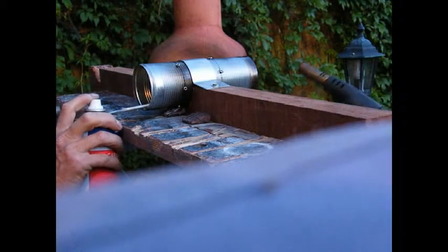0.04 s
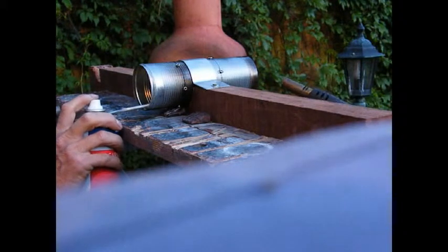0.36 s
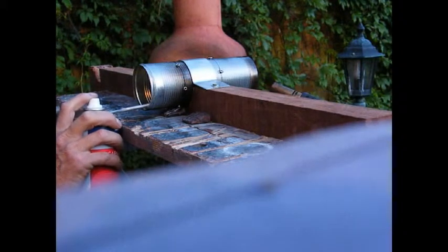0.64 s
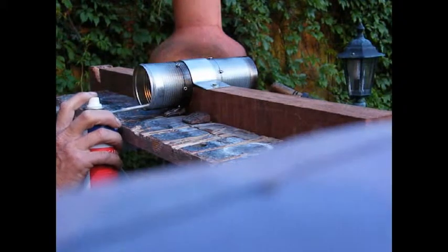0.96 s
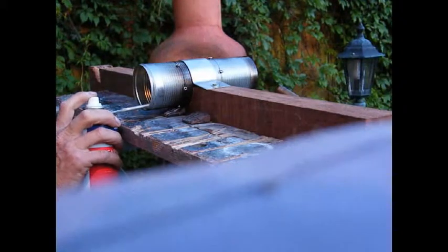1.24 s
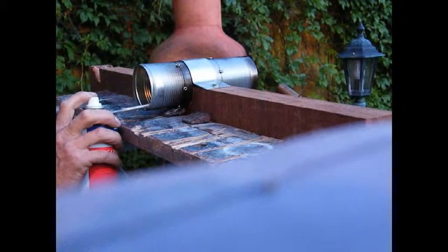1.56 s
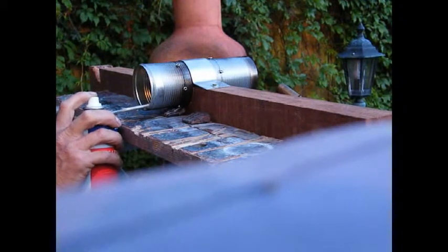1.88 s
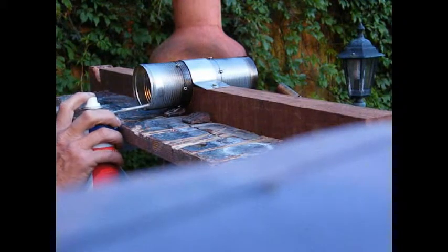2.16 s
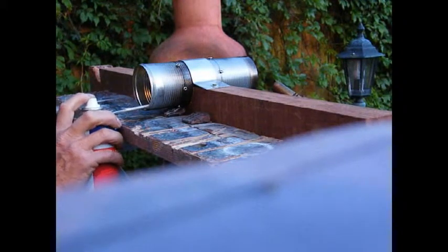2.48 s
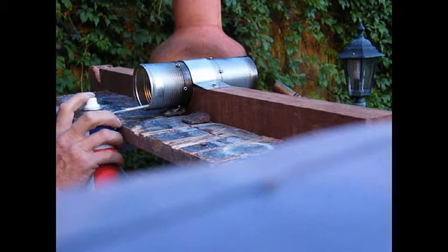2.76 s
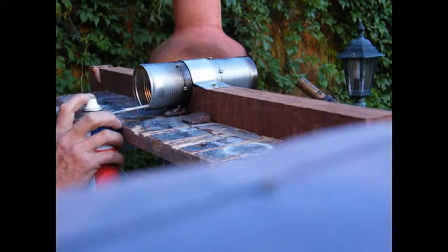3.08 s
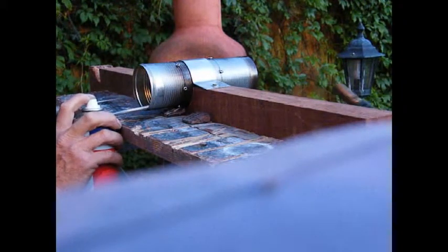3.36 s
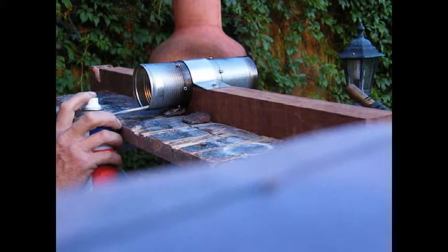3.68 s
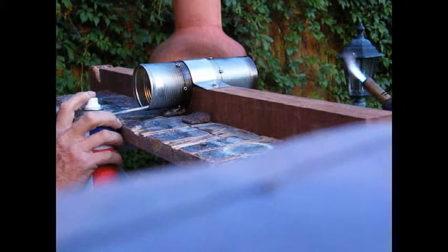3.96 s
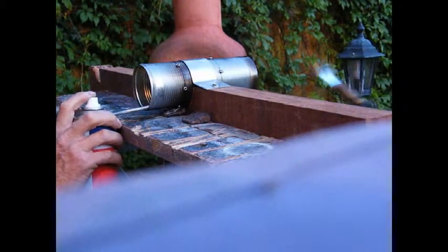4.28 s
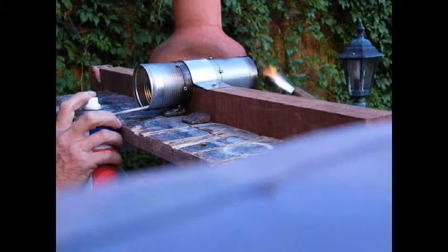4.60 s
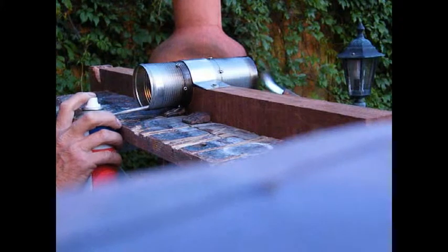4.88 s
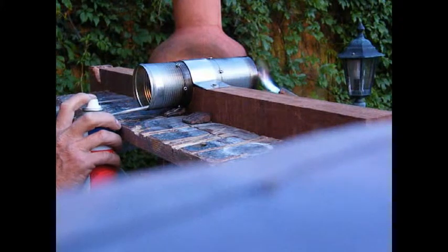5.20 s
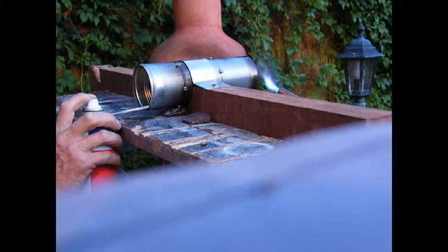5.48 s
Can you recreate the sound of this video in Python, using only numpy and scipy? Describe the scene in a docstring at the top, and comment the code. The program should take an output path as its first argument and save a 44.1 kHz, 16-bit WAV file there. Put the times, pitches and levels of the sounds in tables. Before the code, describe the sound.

A small home-made turbine whines and buzzes, slowly rising in pitch over a steady rush of air through metal cans.

```python
"""A home-made turbine of tin cans speeds up outdoors, its twelve-blade fan whining over a rush of air.
All along, the air roars in the cans, the uneven rotor buzzes, a motor hums and a few low thuds sound.
After three seconds the rotor surges again, and the whine grows louder.
Near the end a gas torch is brought to the outlet and its flame rumbles softly in the draught."""
import sys
import numpy as np
from scipy import signal
from scipy.fft import rfft, irfft
from scipy.io import wavfile

SR = 44100
rng = np.random.default_rng(int(sys.argv[2]) if len(sys.argv) > 2 else 0)


def digitize_waveform(pressure):
    """Quantize a signal to 16-bit integers and store it at the path in sys.argv[1].

    Rows of a 2-D input are taken as channels; values are limited to [-1, 1].
    """
    field = np.atleast_2d(pressure).T
    bounded = np.clip(field, -1, 1)
    quanta = np.round(bounded * 32767).astype(np.int16)
    wavfile.write(sys.argv[1], SR, quanta)


N = 253134
TIME = np.arange(N) / SR
HZ = np.fft.rfftfreq(N, 1 / SR)
BLADE_COUNT, DRONE_MULTIPLE = 12, 8


# A quick run-up, then a smaller surge. Each row: time in seconds, turns a second.
ROTOR_SPEED = [(0.0, 76.07), (0.13, 77.76), (0.46, 84.3), (0.74, 88.75), (1.03, 91.49), (1.76, 95.52),
               (2.01, 96.36), (2.76, 97.63), (3.22, 99.15), (3.83, 102.0), (4.25, 105.57), (4.7, 107.56),
               (5.06, 108.42), (5.74, 108.93)]
def rotor_speed():
    """Turns a second of the rotor, which wobbles slightly in the uneven stream."""
    return curve(ROTOR_SPEED) + 0.036 * drift(rate_hz=4.3)


# The whine's lowest tone. Each row: time in seconds, level in dB.
WHINE_LEVEL = [(0.0, -33), (0.11, -35.5), (0.22, -29), (0.42, -31), (0.51, -22.5), (0.58, -19.5),
               (0.74, -26), (0.83, -22.5), (1.06, -22.5), (1.42, -28.5), (1.75, -27), (2.27, -23.5),
               (2.68, -26.5), (3.01, -23.5), (3.24, -28), (3.35, -36), (3.47, -28), (3.6, -25),
               (3.79, -17.5), (4.08, -16), (4.42, -21.5), (4.56, -18), (5.74, -18)]
# Its overtones. Each row: multiple of that tone's pitch, base level in dB when slow, and when fast.
WHINE_OVERTONES = [(2, -23, -26), (3, -29, -22.5), (4, -26, -26.5), (5, -28.5, -28)]
def whine(turns, speed, cans, flutter_db=0.2362, flutter_hz=12):
    """The blades cut the stream and sing; eddies shake the higher overtones most."""
    levels = {1: curve(WHINE_LEVEL)}
    for k, slow_db, fast_db in WHINE_OVERTONES:
        levels[k] = tone_db(k * BLADE_COUNT, speed, slow_db, fast_db, cans, ring=0.92)
    out = np.zeros(N)
    for k, db in levels.items():
        gain = amp(db + flutter_db * k * drift(flutter_hz))
        wander = 0.003 * k * drift(flutter_hz)
        out += gain * tone(k * BLADE_COUNT * turns + wander)
    return out


# The air stream. Each row: time in seconds, change of level in dB.
AIR_STRENGTH = [(0.0, -0.5), (0.45, 1), (0.95, -1), (1.5, 0.3), (1.85, -1), (2.42, 0), (2.85, -1.2),
                (3.35, -0.6), (3.7, -0.65), (4.5, 0), (4.85, -0.4), (5.2, -0.5), (5.74, -0.5)]
def rush(turns, cans, level_db=-21, gust_db=0.3):
    """Swirling air rings the cans, lightly chopped by every turn and every blade."""
    chop = 1 + 0.045 * tone(turns) + 0.11 * tone(BLADE_COUNT * turns)
    air = shaped(rng.standard_normal(N) * chop, cans)
    air = unit_level(add_echoes(air))
    return air * amp(level_db + curve(AIR_STRENGTH) + gust_db * drift(rate_hz=6.3))


# Pitches at which the cans and their air ring. Each row: pitch in Hz, half width in Hz, gain in dB.
CAN_RESONANCES = [(495, 78, -7), (724, 86, -4), (830, 75, -7.5), (1055, 71, -10), (1290, 177, -6),
                  (1577, 98, -7.5), (2092, 353, -6.5), (2338, 150, -2), (2835, 130, -4.5),
                  (3258, 100, -3.5), (3500, 110, -5.5), (3940, 300, -3.5), (4266, 304, 0.14),
                  (4700, 49, -10), (4970, 56, -10.5), (5060, 620, -7), (5244, 57, -3.5)]
# The smooth rush between them. Each row: frequency in Hz, gain in dB.
RUSH_COLOUR = [(10, -29), (30, -21.5), (75, -18.5), (125, -22), (190, -21), (280, -18.5), (1000, -26),
               (5500, -14.5)]
def can_response():
    """How strongly the cans pass each frequency: rounded peaks over a smooth base."""
    power = sum(amp(db) ** 2 * bump(HZ, hz, width) ** 2 for hz, width, db in CAN_RESONANCES)
    return np.sqrt(power + colour(RUSH_COLOUR, HZ) ** 2)


# The buzz's tones. Each row: multiple of the rotor speed, base level in dB when slow, and when fast.
BUZZ_TONES = [(2, -33.5, -26.5), (3, -34.5, -28.5), (4, -34, -27), (5, -37, -39), (6, -30.5, -33),
              (7, -30, -30), (9, -33.5, -31.5), (10, -33.5, -28), (11, -34, -34), (13, -34.5, -28),
              (14, -40.5, -35.5), (15, -31, -35), (16, -33.5, -29.5), (17, -37, -46), (18, -38.5, -32.5),
              (19, -40, -36.5), (20, -40.5, -38.5), (21, -40.5, -30.5), (22, -39, -35), (23, -36.5, -38),
              (25, -35.5, -39), (26, -39, -41.5), (27, -41, -38), (28, -35.5, -32), (31, -46.5, -38.5),
              (33, -52, -36.5), (37, -40.5, -40.5), (38, -45, -35.5), (39, -36, -46), (40, -40, -44.5),
              (41, -43.5, -42), (42, -39.5, -49), (43, -34.5, -37), (44, -42.5, -48), (47, -43.5, -40),
              (49, -39, -40), (52, -33, -41)]
def buzz(turns, speed, cans, faint_db=-45, waver_db=1.74):
    """No two blades are bent alike, so many multiples of the rotor speed sound too."""
    levels = {k: (faint_db, faint_db) for k in range(2, 51) if k % BLADE_COUNT and k != DRONE_MULTIPLE}
    levels.update({k: (slow_db, fast_db) for k, slow_db, fast_db in BUZZ_TONES})
    out = np.zeros(N)
    for k, (slow_db, fast_db) in levels.items():
        coarse_db = tone_db(k, speed[::256], slow_db, fast_db, cans, ring=1.15)
        db = np.interp(TIME, TIME[::256], coarse_db) + waver_db * drift(rate_hz=2.9)
        wander = 0.027 * drift(rate_hz=4.1)
        out += amp(db) * tone(k * turns + wander)
    return out


# Narrow peaks and dips on the way out of the cans. Each row: pitch in Hz, half width in Hz, gain in dB.
CAN_RIPPLE = [(160, 14, 7), (291, 7, 4), (388, 5, 4), (400, 6, -6), (580, 14, -3.5), (720, 16, -8),
              (875, 16, 4), (912, 16, -8), (1030, 20, 5), (1435, 35, -9), (1516, 14, 4), (1590, 22, 4),
              (1947, 32, -11), (2085, 14, -5), (2140, 34, 2.5), (2225, 8, -5), (2248, 14, 2.5),
              (2284, 11, -6), (2350, 8, -2), (2430, 70, 4.8), (2478, 14, 2.5), (2880, 40, 4.5),
              (3080, 40, 8.5), (3560, 100, -9.2), (3310, 25, 3), (4335, 30, -2.5), (4497, 20, 3),
              (4570, 20, -3), (4660, 14, 3), (4700, 8, 5), (4712, 7, -11), (4825, 65, -14), (4975, 20, 5),
              (5034, 12, -8), (5065, 16, 3)]
SINGING_SPEED, SLOW_SPEED, FAST_SPEED = 90.2, 97.5, 105.4  # turns a second
def tone_db(multiple, speed, slow_db, fast_db, cans, ring):
    """A rotor tone swells as it climbs through each resonance; high tones need speed to sing."""
    hz = multiple * speed
    base_db = np.interp(speed, [SLOW_SPEED, FAST_SPEED], [slow_db, fast_db])
    cans_db = ring * 20 * np.log10(np.interp(hz, HZ, cans))
    ripple_db = sum(db * bump(hz, centre, width) ** 2 for centre, width, db in CAN_RIPPLE)
    loss_db = 0.13 * np.maximum(SINGING_SPEED - speed, 0) * hz / 1000
    return base_db + cans_db + ripple_db - loss_db + swell_db(multiple, speed)


# Each row: multiple of the rotor speed, critical speed and half width in turns a second, gain in dB.
SPEED_SWELLS = [(1, 120, 3, -6), (2, 102, 3, -7), (7, 101.5, 2.5, -3.5), (9, 98.7, 1.3, 5),
                (10, 78, 7.3, 6), (23, 98, 5, 3), (28, 103, 2.4, 5.5), (24, 82, 1.5, -6.5),
                (24, 100.8, 1.5, 1), (36, 77, 6, -8), (40, 104.5, 4.4, 11), (48, 69, 4, -8),
                (60, 79.5, 2.7, 10), (60, 87.5, 2.5, -3.5)]
def swell_db(multiple, speed):
    """Some tones swell or fade as the rotor nears their own critical speed."""
    return sum(db * bump(speed, centre, width) ** 2
               for k, centre, width, db in SPEED_SWELLS if k == multiple)


# A drone at eight times the rotor speed. Each row: time in seconds, level in dB.
DRONE_LEVEL = [(0, -38), (0.45, -32.5), (1.1, -29.5), (2.8, -31.5), (3.4, -29), (4.1, -35.5), (4.6, -41.5),
               (5.74, -37.5)]
def rotor_hum(turns, speed, level_db=-49, mount_hz=98):
    """The unbalanced rotor shakes its mount once a turn, most near its resonance, under a higher drone."""
    mount_db = 3.5 * bump(speed, mount_hz, half_width=2.1)
    loss_db = 0.3 * np.maximum(SINGING_SPEED - speed, 0)
    waver_db = 0.5 * drift(rate_hz=5.5)
    shake = amp(level_db + mount_db - loss_db + swell_db(1, speed) + waver_db) * tone(turns)
    drone = amp(curve(DRONE_LEVEL)) * tone(DRONE_MULTIPLE * turns)
    return shake + drone


# The torch flame. Each row: time in seconds, level in dB.
FLAME_LEVEL = [(0, -69), (3.6, -67), (3.85, -47.5), (4.15, -46), (4.35, -38.5), (5.0, -41.5), (5.74, -38.5)]
# Its rumble. Each row: frequency in Hz, relative level in dB.
FLAME_RUMBLE = [(10, -23.5), (40, -11), (90, -2.5), (160, -9), (280, -0.5), (450, 4.5), (700, -7.5),
                (1500, -16), (5000, -37)]
def flame(flicker_db=0.5):
    """The torch flame rumbles and flickers in the draught."""
    rumble = unit_level(shaped(rng.standard_normal(N), colour(FLAME_RUMBLE, HZ)))
    return rumble * amp(curve(FLAME_LEVEL) - flicker_db * drift(rate_hz=12))


# The motor's tones. Each row: pitch in Hz, level in dB.
MOTOR_TONES = [(72.5, -60), (238.5, -56), (334, -54.5), (382, -45)]
def motor(waver_db=1.3):
    """A motor at constant speed hums in the background."""
    return sum(amp(db + waver_db * drift(rate_hz=0.52)) * tone(hz * TIME) for hz, db in MOTOR_TONES)


# Each row: middle of the thud in seconds, peak level in dB, pitch in Hz.
LOW_THUDS = [(.628, -40, 65), (2.48, -41, 50), (4.269, -29, 95), (4.372, -38, 70), (5.715, -34, 65)]
def thuds():
    """Each thud is one low push and pull of air."""
    out = np.zeros(N)
    for middle, db, hz in LOW_THUDS:
        angle = 2 * np.pi * hz * (TIME - middle)
        out += amp(db) * angle * np.exp((1 - angle ** 2) / 2)
    return out


def add_echoes(sound, level_db=-16, count=40):
    """Bench, walls and leaves throw back faint early echoes."""
    echoes = np.zeros(SR // 40)
    echoes[rng.integers(SR // 300, SR // 55, count)] = rng.choice([-1., 1.], count)
    return sound + amp(level_db) * signal.oaconvolve(sound, echoes / np.sqrt(count))[:N]


def amp(db):
    """Turns decibels into a gain."""
    return 10 ** (db / 20)


def unit_level(sound):
    """Scales a sound to an average (rms) level of one."""
    return sound / np.sqrt(np.mean(sound ** 2) + 1e-20)


def curve(rows):
    """Joins timed points with straight lines, sample by sample."""
    return np.interp(TIME, *np.transpose(rows))


def bump(x, centre, half_width):
    """A hill that is one at its centre and one half at half_width to either side."""
    return 1 / (1 + ((x - centre) / half_width) ** 2)


def colour(rows, hz):
    """Joins rows of Hz and dB into a gain at each given frequency."""
    row_hz, db = np.transpose(rows)
    return amp(np.interp(np.log(hz + 1), np.log(row_hz + 1), db))


def shaped(sound, gains):
    """Turns each frequency of a sound up or down by its gain."""
    return irfft(rfft(sound) * gains, N)


def drift(rate_hz):
    """A random wobble of average size one, mostly slower than rate_hz."""
    times = TIME[::128]
    hz = np.fft.rfftfreq(len(times), times[1])
    slow = irfft(rfft(rng.standard_normal(len(times))) * bump(hz, 0, rate_hz), len(times))
    return np.interp(TIME, times, unit_level(slow - slow.mean()))


def tone(cycles):
    """A pure tone of average level one that starts anywhere in its cycle."""
    return np.sqrt(2) * np.sin(2 * np.pi * (cycles + rng.random()))


def lowpass(sound, hz):
    """Cuts steeply above the given frequency."""
    taps = signal.firwin(371, hz, window=("kaiser", 7), fs=SR)
    return signal.oaconvolve(sound, taps[None], "same")


def scene():
    """The turning rotor drives whine, buzz and hum and chops the rush; both channels are the same."""
    speed = rotor_speed()
    turns = np.cumsum(speed) / SR
    cans = can_response()
    rotor = whine(turns, speed, cans) + buzz(turns, speed, cans) + rotor_hum(turns, speed)
    mono = rotor + rush(turns, cans) + motor() + flame() + thuds()
    return np.array([mono, mono])


# A faint sheen in the treble. Each row: frequency in Hz, gain in dB.
TREBLE_SHEEN = [(6000, -59), (8000, -56.5), (9700, -57.5), (12300, -64), (15500, -69)]
def record(dry, edge_hz=5390, mirror_hz=11025, top_hz=15700):
    """The treble is cut away, and a very faint mirror image of the lower sound takes its place."""
    narrow = lowpass(dry, edge_hz)
    mirrored = narrow * 2 * np.cos(2 * np.pi * mirror_hz * TIME)
    sheen = shaped(mirrored, colour(TREBLE_SHEEN, HZ))
    return lowpass(narrow + sheen, top_hz)


dry = scene()
out = record(dry)
digitize_waveform(out)
```